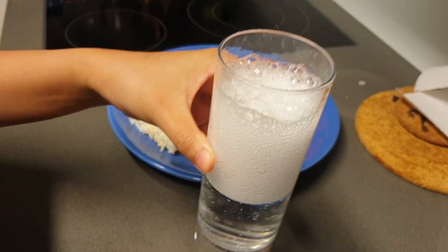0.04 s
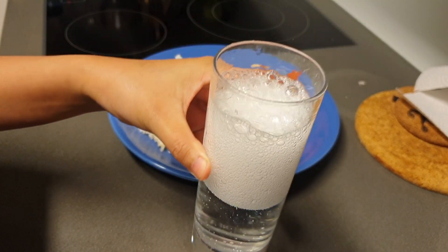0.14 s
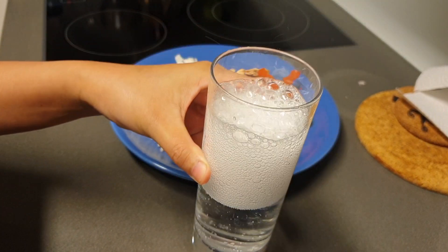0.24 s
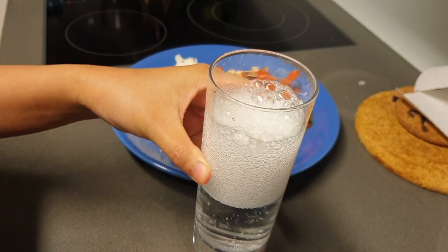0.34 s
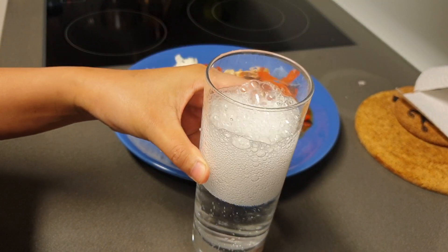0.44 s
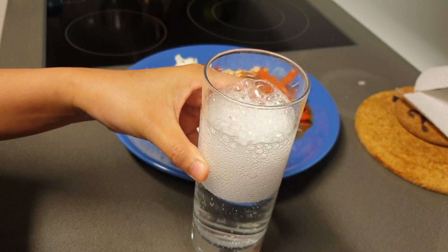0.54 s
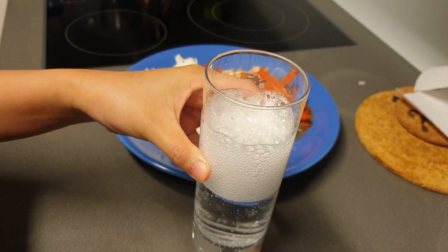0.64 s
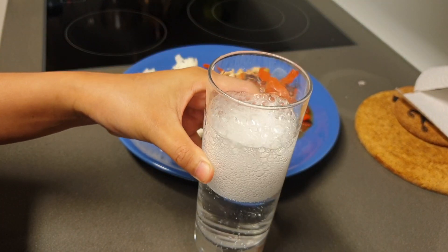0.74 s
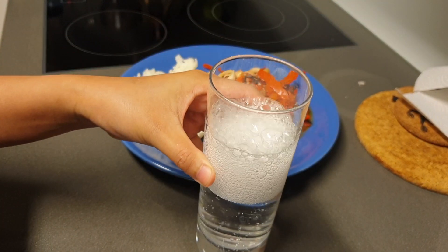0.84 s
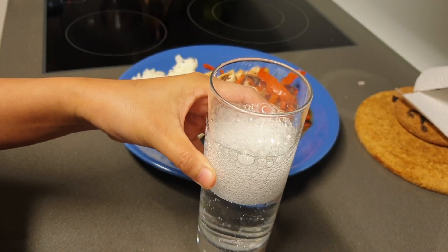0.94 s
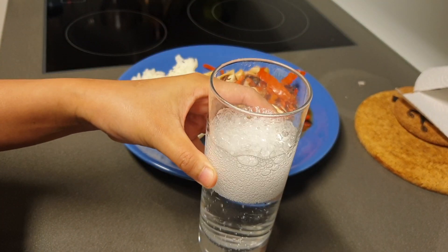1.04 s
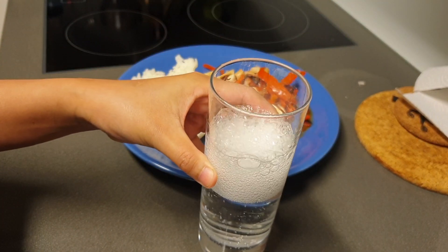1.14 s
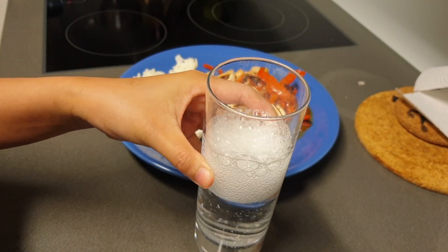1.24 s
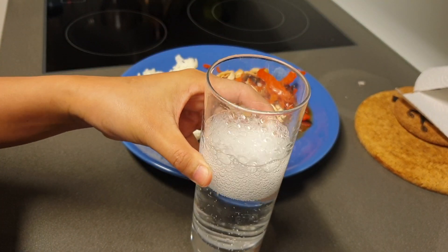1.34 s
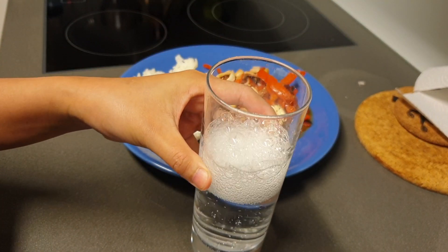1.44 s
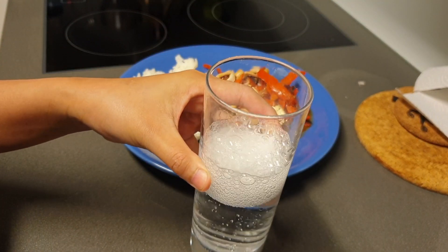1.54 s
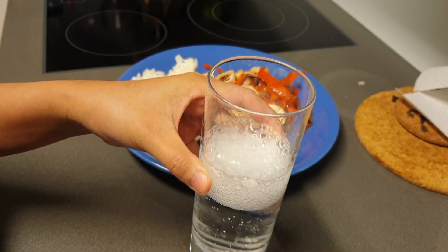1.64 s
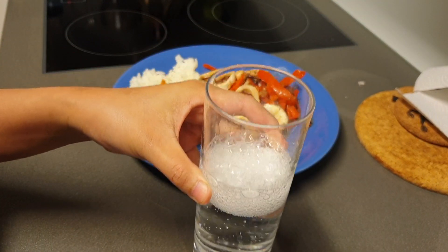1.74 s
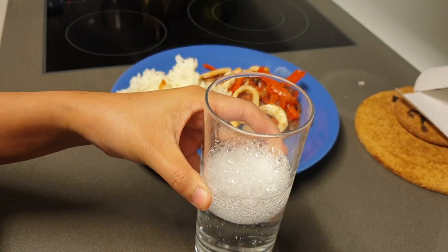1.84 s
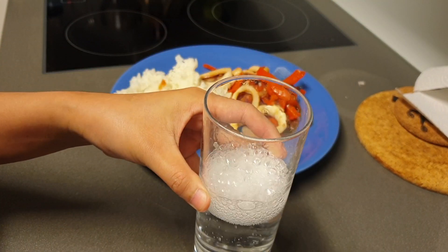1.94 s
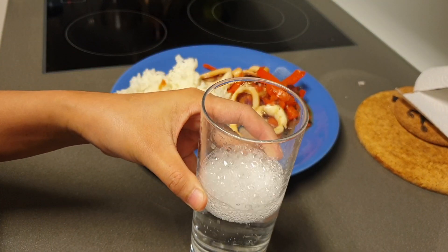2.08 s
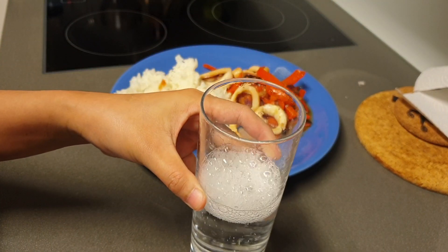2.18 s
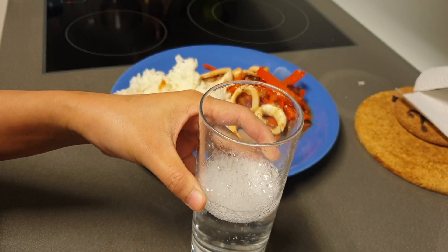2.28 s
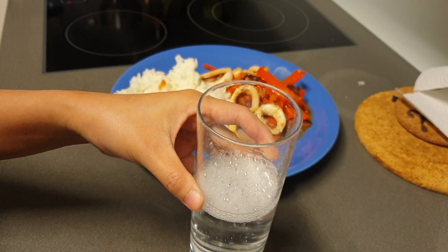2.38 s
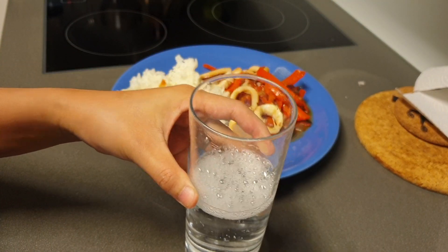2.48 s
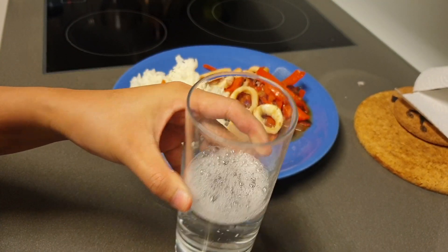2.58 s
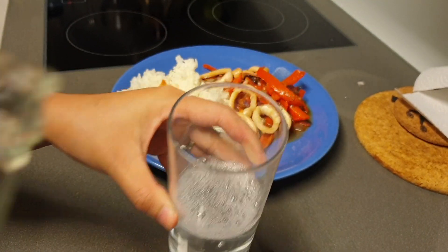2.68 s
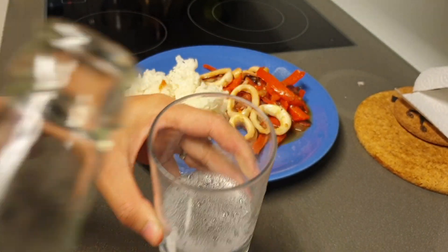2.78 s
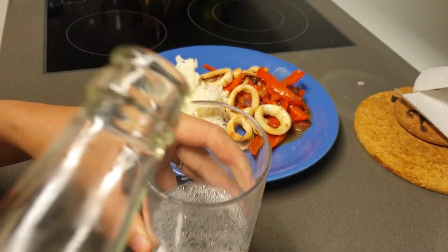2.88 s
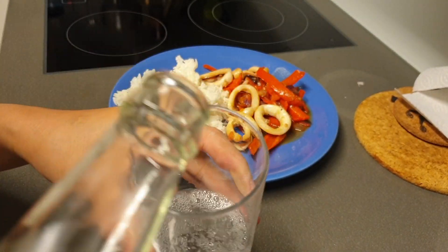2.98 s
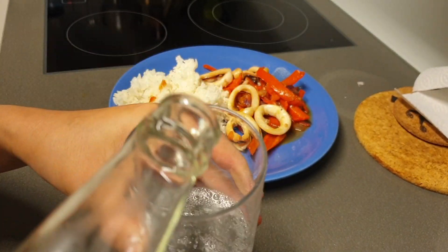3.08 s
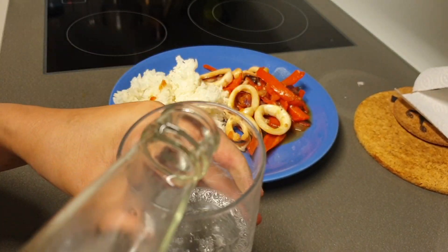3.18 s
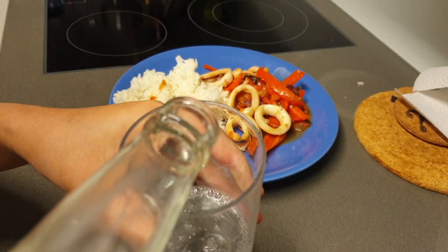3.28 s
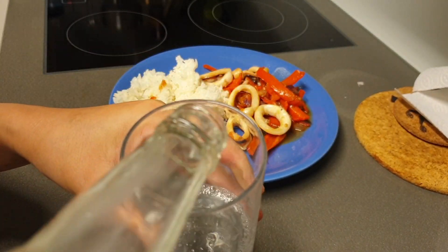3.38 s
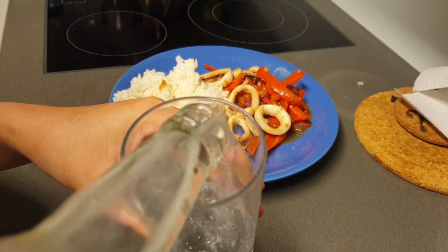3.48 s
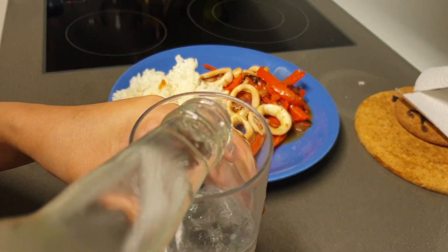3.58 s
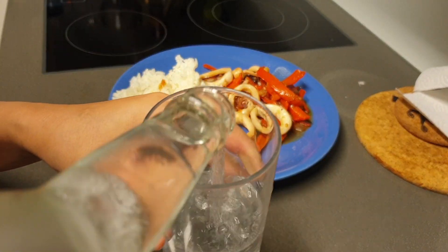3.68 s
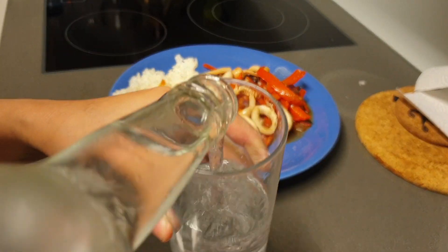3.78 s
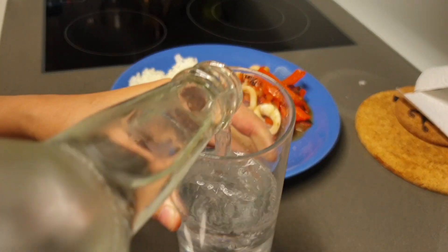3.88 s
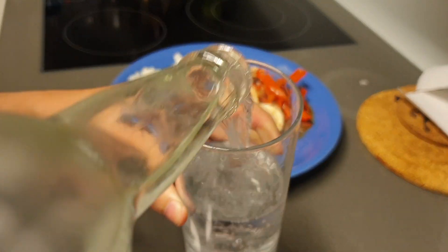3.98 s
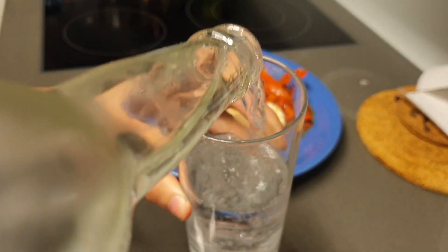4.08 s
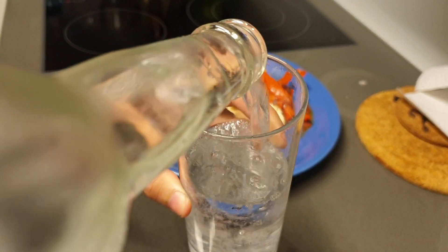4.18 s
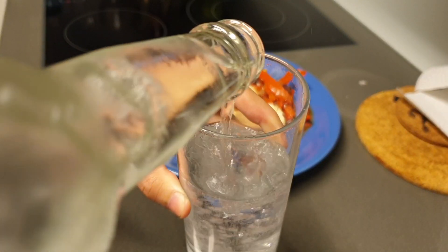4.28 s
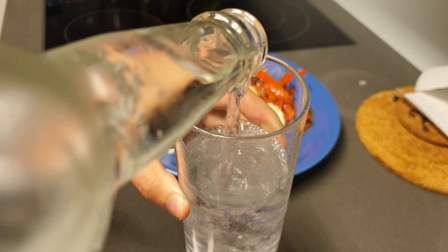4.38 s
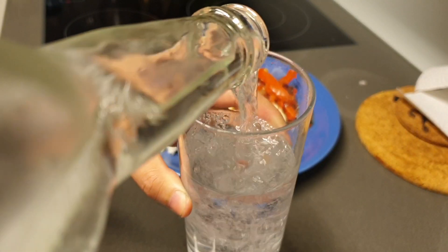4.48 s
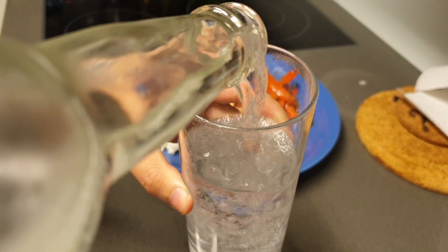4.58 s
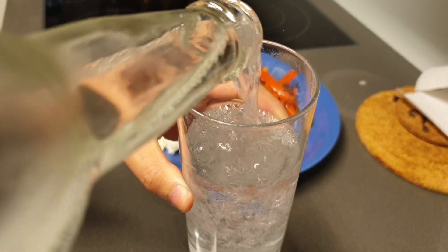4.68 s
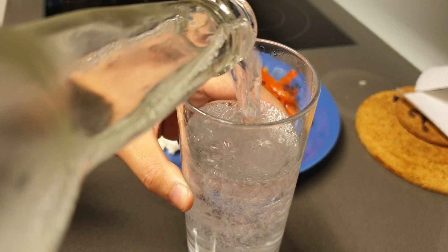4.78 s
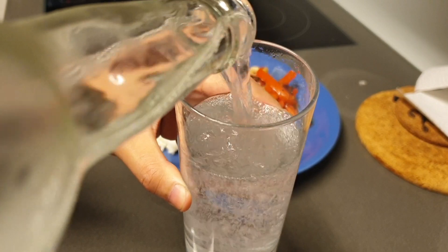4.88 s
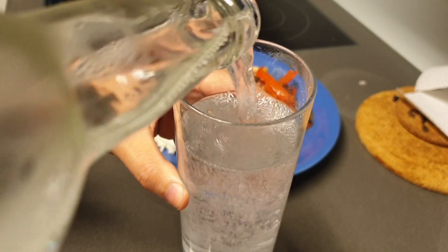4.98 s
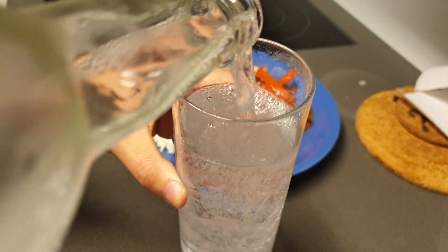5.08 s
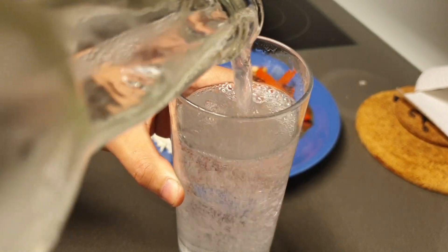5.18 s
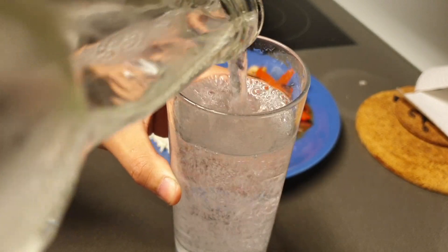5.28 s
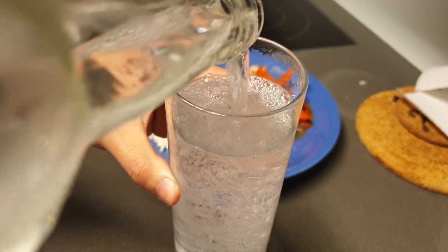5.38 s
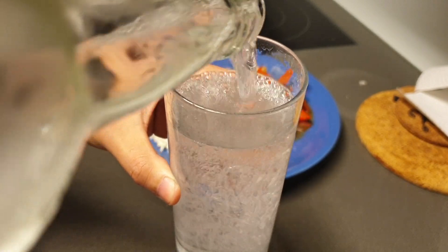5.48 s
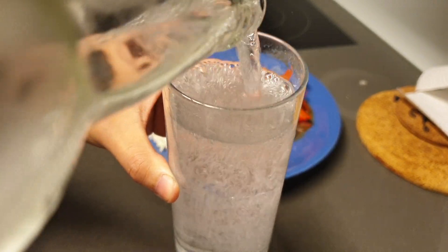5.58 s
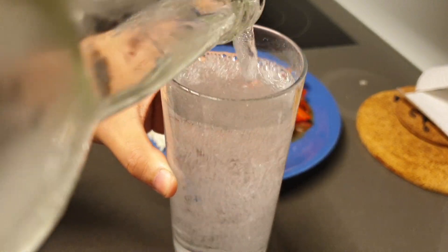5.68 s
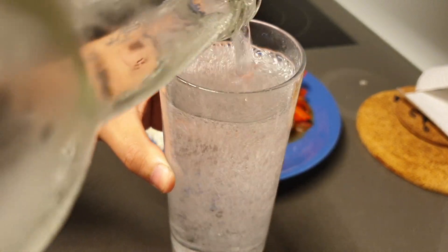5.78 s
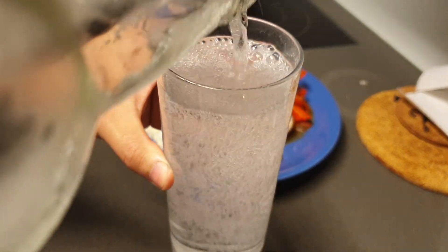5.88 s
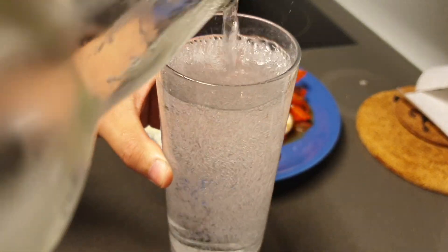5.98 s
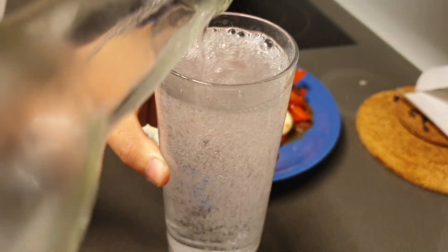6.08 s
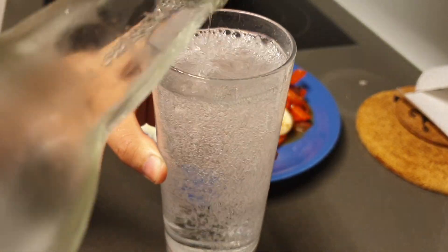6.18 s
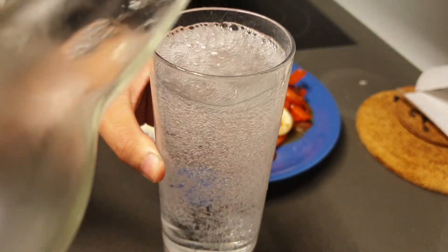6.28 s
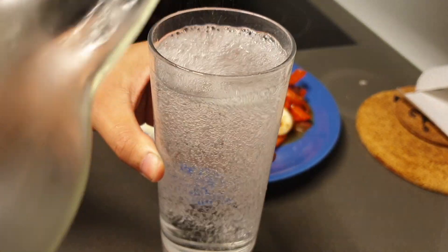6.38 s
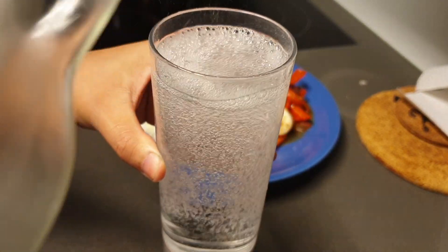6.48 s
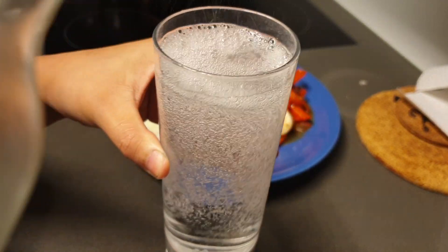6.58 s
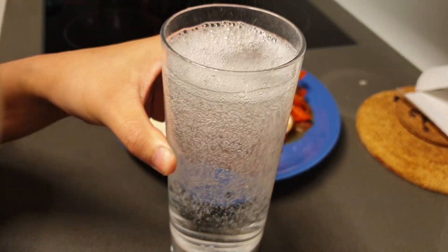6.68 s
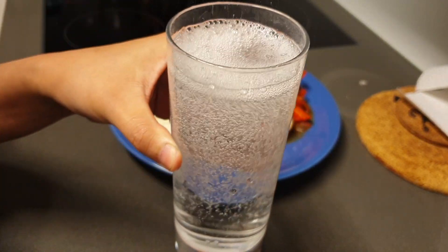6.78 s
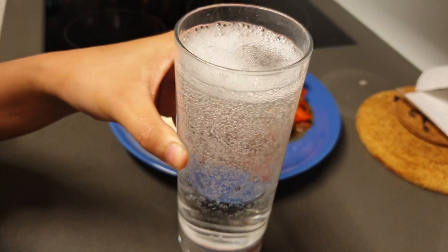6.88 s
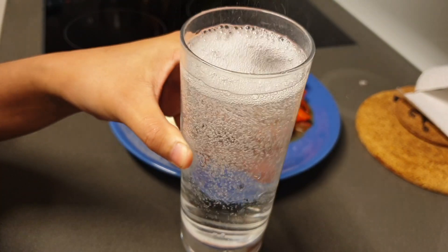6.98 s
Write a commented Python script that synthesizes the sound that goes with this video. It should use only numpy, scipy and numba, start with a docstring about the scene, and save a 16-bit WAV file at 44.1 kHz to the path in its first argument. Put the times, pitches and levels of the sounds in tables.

```python
"""Close at a phone with two microphone ports: foam settles and hisses in a tall glass, in a low-humming kitchen.
Bursting bubbles are shaped noise; the air column above the drink colours them and falls in pitch as foam sinks.
Then a bottle neck clinks on the rim, a sum of glass modes, and soda is poured: noise through the column gurgles
and sprays, bubbles plop as decaying tones, sharp snaps spit, and the room answers the hits shortly.
As the glass fills the column rises in pitch, the plops thin out and fresh foam hisses on to the end."""
import sys
import numpy as np
from scipy import signal
from scipy.fft import rfft, irfft, next_fast_len
from scipy.io import wavfile
from scipy.ndimage import uniform_filter1d, map_coordinates
from numba import njit

SR = 44100
rng = np.random.default_rng(int(sys.argv[2]) if len(sys.argv) > 2 else 0)


def bounce(signal):
    """Save signal as a 16-bit WAV file at the path given by the first command-line argument."""
    frames = np.transpose(np.atleast_2d(signal))
    limited = np.clip(frames, -1, 1)
    pcm = np.round(limited * 32767).astype(np.int16)
    wavfile.write(sys.argv[1], SR, pcm)


N = 310023

# Levels are set at the source, before placement between the ports and the phone's own colour.
# Room rumble over time: start_s [s], level_db [dB]
RUMBLE_LEVEL = [(0, -69.5), (1.25, -70), (1.53, -61.5), (1.75, -70), (2.64, -64), (3.44, -70), (3.64, -63),
                (4.4, -68.5), (4.7, -62.5), (5.1, -66), (5.6, -66), (6.3, -69.5), (6.9, -65.5)]
# Colour of the rumble: pitch_hz [Hz], level_db [dB per Hz, relative]
RUMBLE_COLOUR = [(15, -49), (25, -9.5), (107, 11.5), (146, -1.5), (206, -2.5), (253, -11.5), (280, -7),
                 (356, -7), (615, -18), (897, -14.5), (1160, -20), (1330, -58), (1500, -39), (1950, -42),
                 (3300, -120)]
# Mains tone: pitch_hz [Hz], level_db [dB rms]
MAINS_TONE = [(50, -79)]
# Likeness of the rumble at the two ports: pitch_hz [Hz], likeness [0-1]
ROOM_LIKENESS = [(40, 0.67), (100, 0.93), (180, 0.81), (300, 0.26), (1000, 0.18)]
# Decay of the room's answer: pitch_hz [Hz], t60_s [s]
WALL_DECAY = [(300, 0.15), (2000, 0.24), (12000, 0.041)]

# Air column in the glass: start_s [s], low_mode_hz [Hz], low_width_hz [Hz], upper_mode_hz [Hz], hollowness [0-1]
AIR_COLUMN = [(0, 1580, 710, 2880, 0), (.6, 1240, 457, 2950, 0.2), (1.3, 1110, 348, 3220, 0),
              (1.8, 910, 253, 2830, 0.06), (2.2, 874, 121, 2730, 0.2), (2.8, 876, 71, 2780, 0.3),
              (3.1, 878, 55, 2800, 0.9), (3.5, 817, 48, 2670, 0.8), (3.8, 920, 48.4, 2750, 0.2),
              (4.1, 973, 69.5, 2740, 0.7), (4.5, 1214, 100, 2870, 0.4), (4.95, 1340, 200, 3080, 0.8),
              (5.35, 1790, 284, 3450, 1), (5.52, 2000, 380, 3630, 0.8), (5.7, 2190, 505, 3600, 0.1),
              (6.1, 2720, 800, 4130, 0), (7.03, 2500, 900, 4360, 0.55)]
# Peaks and dips on the way from glass to phone: pitch_hz [Hz], level_db [dB]
GLASS_TO_PHONE = [(500, -16), (680, -8), (760, -2), (900, 0), (1030, -3), (1170, 0), (1350, -7), (1550, 0),
                  (1680, -3), (2200, -2), (5000, -2.5)]
# Likeness of foam and stream at the two ports: pitch_hz [Hz], likeness [0-1]
NEAR_LIKENESS = [(300, 0.47), (700, 0.52), (1100, 0.88), (1600, 0.063), (3100, 0.36), (6800, 0.064),
                 (15000, 0.026)]
# Colour difference of the ports: pitch_hz [Hz], left_minus_right_db [dB]
PORT_COLOUR = [(700, 0), (1000, 0), (2000, 1.5), (8500, -4.5), (11000, 0.5), (13000, -8.5), (15000, -11)]

# Bursting foam by bubble size; the rise near 2.075 s is a handling rustle:
# start_s [s], small_db [dB], larger_db [dB], largest_db [dB]
FOAM_LEVELS = [(0, -54, -60.5, -67.5), (.51, -54.5, -60.5, -66.5), (.84, -50, -58.5, -68.5),
               (1.04, -52, -60.5, -72), (1.64, -51, -58, -72), (2.04, -51, -59, -72),
               (2.075, -50, -54.5, -64), (2.12, -50, -57, -68.5), (2.39, -50.5, -59, -72.5),
               (2.86, -47, -56, -77), (3.13, -48, -61.5, -84), (3.45, -50.5, -70.5, -85),
               (3.6, -49.5, -63, -76), (3.95, -59, -65, -73), (4.45, -56.5, -63.5, -82),
               (5.0, -50.5, -63.5, -67.5), (5.4, -48.5, -61.5, -70), (6.05, -48.5, -57.5, -83),
               (6.54, -46, -56, -72.5), (7.03, -46, -52, -60.5)]
# Foam heard through the column: start_s [s], level_db [dB], low_murmur_db [dB]
FOAM_IN_COLUMN = [(0, -53.5, -76.5), (.6, -52, -77), (.75, -47.5, -75.5), (.88, -46.5, -70),
                  (1.2, -46.5, -72), (1.46, -45.5, -70.5), (1.88, -42, -70.5), (2.04, -39.5, -58.5),
                  (2.25, -42, -68), (2.75, -49, -78), (2.95, -51.5, -97), (3.1, -60.5, -72),
                  (3.3, -59, -82), (3.46, -65, -83)]
# Side of the foam, left minus right: start_s [s], larger_db [dB], small_db [dB]
FOAM_SIDE = [(0, 6, 7.5), (2.0, 8.5, 9.5), (3.3, 9, 9), (5.07, 10, 9), (7.03, 7.5, 8)]
# Colour of small bubbles: pitch_hz [Hz], level_db [dB per Hz, relative]
SMALL_COLOUR = [(3240, -24.5), (4600, -21), (5300, -8.5), (6000, -10), (7140, 1.5), (8630, -8.5),
                (8980, -8), (11500, 1.5), (12700, 4.5), (14200, 2), (15800, -0.5)]
# Colour of larger bubbles: pitch_hz [Hz], level_db [dB per Hz, relative]
LARGER_COLOUR = [(1400, -23), (2000, -10.5), (2250, -2), (2490, 0), (3480, 0.5), (4200, 3.5), (4600, 1),
                 (5100, 3.5), (5900, 1.5), (7000, 1), (8500, -13), (9000, -20), (11700, -42), (19800, -120)]
# Colour of the largest bubbles: pitch_hz [Hz], level_db [dB per Hz, relative]
LARGEST_COLOUR = [(600, -37), (1000, -15), (1420, -13), (1540, 2), (1640, -1), (2100, 2.5), (2800, -19),
                  (5000, -52)]

# Bottle neck on the rim: start_s [s], level_db [dB]
RIM_CLINKS = [(3.494, -30)]
# Modes of the glass: pitch_hz [Hz], level_db [dB re the clink], t60_s [s]
GLASS_MODES = [(1622, -14, .3), (1650, -21, .2), (3395, -15, .2), (3440, -25, .1), (2230, -20, .05),
               (2470, -17, .04), (2750, -11.5, .035), (3080, -24, .2), (3840, -18, .05), (3970, -12, .09),
               (5330, -23, .05), (10060, 2, .02), (11000, -7, .028)]
# Soft low thuds: start_s [s], level_db [dB], pitch_hz [Hz], t60_s [s]
THUDS = [(2.063, -54.5, 400, 0.075), (2.09, -62, 115, 0.2), (3.62, -37.5, 97.4, 0.063),
         (4.018, -51.5, 124, 0.17), (4.189, -46.5, 107, 0.027), (4.499, -56, 397.6, 0.3),
         (4.737, -58.5, 117, 0.36)]

# Sharp spits: start_s [s], level_db [dB], pitch_hz [Hz]
SNAPS = [(2.0571, -42, 5530), (2.057, -42, 7300), (2.0794, -41, 11800), (2.0797, -50, 6700),
         (2.241, -42, 11800), (3.0092, -47, 11800), (3.4792, -75, 10000), (3.538, -38, 11000),
         (3.547, -34, 10300), (3.56, -24, 12400), (3.6027, -32, 6000), (3.601, -31, 11200),
         (3.605, -34, 12500), (3.611, -32, 10800), (3.6163, -21, 12500), (3.6337, -35, 5140),
         (3.671, -40, 10900), (3.7083, -24, 13600), (3.73, -46, 11800), (3.7421, -13.5, 13000),
         (3.746, -29, 6960), (3.7708, -29.5, 6000), (3.775, -29.5, 6100), (3.8449, -32, 5970),
         (3.868, -55, 8000), (3.8864, -41, 7750), (3.893, -34, 7560), (4.019, -51, 11000),
         (4.048, -34.5, 10050), (4.0745, -35.5, 11200), (4.1066, -46, 12300), (4.1244, -37, 11600),
         (4.172, -36, 6460), (4.1745, -33, 8100), (4.1874, -32, 7100), (4.215, -36, 13400),
         (4.2577, -45, 14000), (4.28, -34, 9200), (4.287, -34, 5160), (4.299, -11.5, 11300),
         (4.305, -36, 11800), (4.3275, -29, 7100), (4.36, -32, 10000), (4.3608, -32, 5100),
         (4.3605, -37, 13300), (4.387, -38, 14000), (4.1405, -39, 12700), (4.1245, -39, 14500),
         (4.0748, -37, 14000), (3.7665, -45, 8000), (4.371, -34, 10800), (4.452, -39, 13700),
         (4.4815, -23.5, 14500), (4.505, -28, 14000), (4.578, -40, 6900), (4.595, -47, 11450),
         (4.6499, -28.5, 7100), (4.655, -38, 6660), (4.6783, -43, 11300), (4.703, -44, 6940),
         (4.7404, -29.5, 5940), (4.783, -26, 12200), (4.785, -28.5, 7700), (4.755, -45, 12500),
         (4.689, -42, 13500), (4.611, -43, 11500), (4.804, -40, 12000), (4.812, -40, 11500),
         (4.7857, -28, 10500), (4.837, -31, 13100), (4.838, -35.5, 7740), (4.862, -40, 7240),
         (4.9408, -39, 12500), (4.9631, -45, 10900), (4.9903, -39.5, 6700), (5.044, -36, 11700),
         (5.05, -36, 14500), (5.056, -39, 6960), (5.062, -43, 12400), (5.086, -44, 7100),
         (5.145, -25, 10900), (5.221, -39.5, 7300), (5.324, -39, 13200), (5.389, -40, 7550),
         (5.465, -44, 13900), (5.528, -43, 7000), (5.5784, -32, 12500), (5.672, -39, 13700),
         (5.9426, -41, 7100), (6.278, -38.5, 13500)]
# Bubbles trapped by the stream: start_s [s], level_db [dB], pitch_hz [Hz], t60_s [s]
TRAPPED_BUBBLES = [(3.494, -24, 835, 0.044), (3.602, -35.5, 1093, 0.057), (3.601, -22.5, 3650, 0.024),
                   (3.628, -47, 880, 0.054), (3.709, -53, 2000, 0.017), (3.742, -28.5, 3730, 0.021),
                   (3.545, -39.5, 2560, 0.038), (3.53, -46, 851, 0.1), (3.615, -35, 871, 0.062),
                   (3.615, -28, 4350, 0.021), (3.694, -43, 4010, 0.055), (3.868, -33, 4380, 0.018),
                   (3.742, -30.5, 969, 0.091), (3.747, -27, 939, 0.079), (3.745, -30.5, 2830, 0.019),
                   (3.763, -48, 936, 0.028), (3.776, -24, 954, 0.066), (3.781, -21.5, 966, 0.055),
                   (3.777, -31.5, 2810, 0.021), (3.811, -44, 990, 0.02), (3.846, -27, 2655, 0.022),
                   (3.892, -40, 2860, 0.017), (3.959, -35, 1045, 0.046), (4.013, -35, 985, 0.097),
                   (4.015, -43.5, 2820, 0.028), (4.045, -38, 1002, 0.1), (4.062, -27.5, 980, 0.045),
                   (4.061, -43, 2800, 0.029), (4.075, -38, 998, 0.069), (4.099, -37, 2910, 0.03),
                   (4.108, -36.5, 2950, 0.036), (4.125, -40, 2960, 0.02), (4.22, -57, 1620, .09),
                   (4.25, -49, 1090, 0.069), (4.252, -52, 1770, .06), (4.125, -42, 1103, 0.036),
                   (4.285, -30, 4280, 0.021), (4.298, -31, 1250, 0.0067), (4.3, -39, 4240, 0.017),
                   (4.327, -25, 3586, 0.039), (4.326, -22, 2750, 0.018), (4.359, -24.5, 1555, 0.043),
                   (4.359, -38, 2730, 0.014), (4.359, -43, 1140, 0.029), (4.43, -45, 1130, 0.048),
                   (4.449, -28, 1160, 0.032), (4.45, -36, 4760, 0.017), (4.503, -21, 1143, 0.044),
                   (4.506, -32, 1500, 0.04), (4.506, -38, 910, .035), (4.554, -47, 1130, 0.052),
                   (4.655, -39, 2320, 0.032), (4.678, -27, 1130, 0.021), (4.679, -40.5, 830, 0.024),
                   (4.727, -39, 4030, .02), (4.701, -31, 4370, 0.021), (4.734, -38, 1180, 0.028),
                   (4.687, -44, 1410, .03), (4.767, -39, 4200, .015), (4.775, -27.5, 1300, 0.024),
                   (4.785, -27.5, 1287, 0.023), (4.785, -35, 1550, .025), (4.786, -32, 4070, 0.015),
                   (4.802, -37, 1456, .04), (4.812, -35, 4230, 0.015), (4.824, -40, 3120, 0.018),
                   (4.835, -32, 1360, 0.013), (4.868, -30.5, 1310, 0.025), (4.869, -49, 1590, 0.023),
                   (4.883, -41, 1710, .02), (4.896, -29, 1435, 0.029), (4.897, -44, 1720, .02),
                   (4.94, -36, 1480, .025), (4.961, -42, 1800, 0.029), (4.927, -23.5, 1380, 0.018),
                   (4.96, -38, 1540, 0.012), (4.959, -40, 3300, .019), (4.989, -35, 5020, 0.025),
                   (5.006, -41, 3140, 0.021), (5.025, -43, 3170, 0.034), (5.032, -29.5, 1550, 0.019),
                   (5.038, -31, 1670, 0.024), (5.097, -42, 1770, 0.022), (5.096, -51, 3370, 0.026),
                   (5.104, -39.5, 3300, .025), (5.158, -41, 1606, 0.04), (5.188, -40, 3320, 0.025),
                   (5.231, -38, 4950, 0.015), (5.257, -34, 5150, 0.017), (5.581, -41, 4950, .025),
                   (5.32, -39.5, 1804, 0.038), (5.346, -30.5, 1810, 0.019), (5.431, -45, 1780, 0.032),
                   (5.432, -39, 2260, 0.0081), (5.434, -39, 2760, .012), (5.356, -47, 1470, 0.051),
                   (5.588, -44, 2250, 0.021), (5.586, -46, 1760, 0.031), (5.62, -43, 2250, 0.023),
                   (5.646, -45, 2270, 0.024), (5.656, -40.5, 1820, 0.029), (5.714, -48, 1000, 0.012),
                   (5.717, -39.5, 1540, 0.0049), (5.778, -49.5, 2330, 0.054), (5.779, -38, 3300, 0.0063),
                   (5.797, -40, 4100, .012), (5.915, -47, 1790, 0.02), (5.914, -47, 2650, 0.0094),
                   (5.9155, -37, 3130, 0.013), (5.925, -43, 2730, 0.016), (5.926, -39, 3580, .012),
                   (5.954, -49.5, 1750, .02), (5.957, -43, 3800, .012), (5.924, -52, 1800, .012),
                   (5.781, -46, 3800, .008), (5.956, -47, 2800, .02), (5.998, -45, 2720, .015),
                   (6, -39, 4120, 0.016)]
# Bubbles that bend as they rise or squeeze: start_s [s], level_db [dB], pitch_hz [Hz], t60_s [s], bend [octaves/s]
BENDING_BUBBLES = [(3.6, -42, 2486, 0.13, 1), (3.764, -23.5, 3600, 0.023, 3),
                   (3.892, -25.5, 845, 0.045, -11), (3.912, -49, 1200, 0.059, -2),
                   (3.963, -46, 3880, 0.026, 3), (4.012, -45, 3840, .02, -7), (4.173, -34, 4200, 0.024, -9),
                   (4.21, -43, 4300, .025, -6), (4.27, -42, 2420, 0.028, 2), (4.312, -34, 4100, .025, -5),
                   (4.36, -44, 3120, 0.11, 5), (4.431, -43, 2220, .035, 14), (4.537, -47, 3300, .04, -7),
                   (4.706, -42, 3030, .035, -3.5), (4.738, -49, 2930, 0.033, -4),
                   (4.764, -38, 2880, 0.023, 6), (4.862, -52, 3300, .05, -2), (5.255, -53, 3500, 0.073, -2),
                   (5.465, -38, 3400, 0.016, 6), (5.472, -34.5, 3500, 0.017, 18),
                   (5.516, -63, 3620, .04, 2), (5.536, -45, 3630, 0.032, -7), (5.577, -43, 3520, .04, 2),
                   (5.582, -48, 2800, .02, -25), (5.62, -41, 3550, 0.022, 3), (5.647, -42, 3200, 0.028, -5),
                   (6.016, -53, 2600, .03, 10), (6.057, -45, 3750, 0.028, -2)]

# Stream between splashes: start_s [s], gurgle_db [dB], spray_db [dB]
STREAM_LEVELS = [(3.49, -38, -47.5), (3.7, -70, -53), (3.93, -55, -68), (4.07, -44, -65), (4.2, -55, -71),
                 (4.32, -47.5, -40.5), (4.6, -45, -102), (4.72, -42.5, -50.5), (4.85, -40, -51),
                 (4.95, -43, -67), (5.1, -57, -59.5), (5.55, -77, -61.5), (6.05, -82, -57.5)]
# Gushes that hit the drink: start_s [s], gurgle_db [dB], spray_db [dB]
GUSHES = [(3.497, -46, -65), (3.601, -20.5, -35.5), (3.745, -24.5, -45), (3.771, -58, -37.5),
          (3.845, -43, -61), (3.895, -27.5, -42.5), (4.1, -52, -64), (4.328, -35, -41), (4.361, -26, -31.5),
          (4.455, -34, -75), (4.512, -26, -51), (4.65, -44, -40.5), (4.7, -49, -65), (5.038, -45, -80),
          (5.29, -79, -75)]
# Colour of the spray: pitch_hz [Hz], level_db [dB per Hz, relative]
SPRAY_COLOUR = [(700, -48), (1500, -1), (3500, 5.5), (7000, 8), (9000, -9), (12000, 10), (14000, 9),
                (15800, 5)]
# Air in the emptying bottle: start_s [s], pitch_hz [Hz]
BOTTLE_PITCH = [(3.75, 518), (4.1, 352), (4.45, 330), (4.8, 315), (5.5, 370)]
# Hoots of that air: start_s [s], level_db [dB]
HOOTS = [(3.784, -66), (3.9, -57.5), (4.096, -62), (4.36, -63.5), (4.52, -55.5), (4.794, -62.5),
         (5.49, -69.5)]

LAG = 3  # samples by which the right port hears later
LOW_CUT_HZ, TOP_HZ = 30, 15760
TALLEST = 6  # no burst outgrows this many spreads
NECK_HZ, NECK_WIDTH_HZ = 754, 46  # a steady low mode under the stream
SPLASH_RISE, GURGLE_FALL, SPRAY_FALL = 6400, 810, 830  # dB a second
HOOT_RISE, HOOT_FALL = 270, 153  # dB a second
DAMPED_S, DAMPED_DB_PER_S = .062, 500  # the touching neck soon deadens the ring

START_SHARE = 0.082  # time constant of a bubble's swell, as a share of its ring time
FROTH_DB, SMACK_DB, BLOW_DB = -14, -12, 4  # relative to a plop of 1 kHz
FROTH_SLOPE, SMACK_SLOPE, BLOW_SLOPE = -2, -10, -12.5  # dB for each octave above it
PLOP_LEFT_DB, LEFT_DB_PER_S = 3.5, 2  # mean at the first plop; the surface climbs towards the left port
# A fainter bubble follows each: mean relative level, latest delay, pitch spread
SATELLITE_DB, SATELLITE_S, SATELLITE_OCTAVES = -11.5, .03, 0.217
FAINT_FROM_S, FAINT_TO_S = 3.5, 5.6  # faint bubbles and spits come at random in between
DRIP_FLOOR_DB, DRIP_SPREAD_DB, DRIP_CYCLES = -62.5, 3.5, 36  # cycles in one ring time

SPIT_T60_S, SNAPPIER = 0.0044, 0.22  # for a snap of -28.5 dB; dB off the ring time for each dB more
SCATTER_DB, SCATTER_GROWS = -43.5, 0.76  # droplets with a snap of -34 dB; dB for each dB more
CRACK_DB, PATTER_DB = -10.5, 3.5  # the film's rough click re the snap; spread of droplet sizes
SPIT_LEFT_DB, SPIT_LEFT_SPREAD_DB = 13, 0.1
FLECK_DB, FLECK_SPREAD_DB = -54, 1.5  # before the small bubbles' colour is added
FLECK_LOW_HZ, FLECK_HIGH_HZ = 5780, 14900


def amp(db):
    """Gain for a level in dB."""
    return 10 ** (np.asarray(db) / 20)


def unit(x):
    """Scales to an rms of one."""
    return x / np.sqrt(np.mean(x ** 2) + 1e-20)


def along(points, hz):
    """Reads (pitch_hz, value) points on a log axis."""
    f, v = np.transpose(points)
    return np.interp(np.log(hz + 1), np.log(f + 1), v)


def curves(rows, outside=None):
    """One value per sample for each column after start_s."""
    s, *cols = np.transpose(rows)
    return [np.interp(np.arange(N) / SR, s, c, outside, outside) for c in cols]


def wobble(rate):
    """A smooth random curve, rate knots a second."""
    knots = rng.standard_normal(int(N * rate / SR) + 4)
    return map_coordinates(knots, [np.arange(N) * rate / SR])


def sides(left_db):
    """Left and right gains for a level difference."""
    return amp(np.array([left_db / 2, -left_db / 2]))


def filtered(x, response):
    """Multiplies the spectrum by a complex response of frequency."""
    m = next_fast_len(N + SR // 2)
    return irfft(rfft(x, m) * response(np.fft.rfftfreq(m, 1 / SR)), m)[..., :N]


def add(out, s, sound, left_db):
    """Places a sound; the left port hears it earlier, and louder when left_db is positive."""
    length = sound.shape[-1]
    pair = np.broadcast_to(sound, (2, length))
    for ch, lag in enumerate((0, LAG)):
        piece = out[ch, round(s * SR) + lag:][:length]
        piece += sides(left_db)[ch] * pair[ch, :len(piece)]


def swells(times, peaks_db, rise, fall):
    """A gain that climbs to each peak and falls away, in dB a second."""
    t = np.arange(N) / SR
    slopes = [db - np.maximum(rise * (s - t), fall * (t - s)) for s, db in zip(times, peaks_db)]
    return amp(np.max(slopes, axis=0))


def crackle(spread_db):
    """Two noises of dense bursts whose sizes scatter widely."""
    draws = np.minimum(rng.exponential(size=(2, N // 16 + 1)), TALLEST)
    sizes = amp(spread_db * draws).repeat(16, axis=1)[:, :N]
    return unit(sizes * rng.standard_normal((2, N)))


def rush(pair, spectrum, patchy_db, alike=NEAR_LIKENESS):
    """Colours two noises, gives them patches of random gain and the ports' likeness; the right port lags."""
    z = signal.stft(pair, nperseg=256)[2]
    field = uniform_filter1d(rng.standard_normal(z.shape[1:]), size=7, axis=0)
    field = uniform_filter1d(field, size=5, axis=1)
    pair = signal.istft(z * amp(patchy_db * unit(field)), nperseg=256)[1][:, :N]

    def mid_side(hz):
        turn = np.arccos(np.clip(along(alike, hz), -1, 1)) / 2
        return amp(along(spectrum, hz)) * [np.cos(turn), np.sin(turn)]

    mid, side = filtered(pair, mid_side)
    return unit(np.array([mid + side, np.roll(mid - side, shift=LAG)]))


def puff(t, low_hz, high_hz):
    """A short noise between two frequencies, the lower the more alike at both ports."""
    band = signal.butter(2, [low_hz, min(high_hz, SR / 2 - 100)], "bandpass", fs=SR, output="sos")
    a, b = signal.sosfilt(band, rng.standard_normal((2, len(t))))
    alike = np.clip(1000 / low_hz, 0, .95)
    return unit(np.array([a, alike * a + np.sqrt(1 - alike ** 2) * b]))


@njit
def resonate(x, hz, width, sr):
    """A two-pole resonance whose pitch and width can move."""
    y = np.zeros(len(x))
    for i in range(2, len(x)):
        r = np.exp(-np.pi * width[i] / sr)
        angle = 2 * np.pi * hz[i] / sr
        drive = np.sqrt(1 - r * r) * np.sin(angle) * (x[i] - x[i - 2])
        y[i] = drive + 2 * r * np.cos(angle) * y[i - 1] - r * r * y[i - 2]
    return y


def ring(x, hz, width):
    """Both channels through one moving resonance."""
    return np.array([resonate(v, hz, width, SR) for v in x])


def column(x, upper_db, neck_db=-120):
    """The air above the drink rings at its two modes, the bottle neck at its own."""
    low_hz, width, upper_hz, _ = curves(AIR_COLUMN)
    both = ring(x, low_hz, width) + amp(upper_db) * ring(x, upper_hz, 150 + 1.9 * width)
    neck = amp(neck_db) * ring(x, np.full(N, float(NECK_HZ)), np.full(N, float(NECK_WIDTH_HZ)))
    return filtered(both + neck, lambda hz: amp(along(GLASS_TO_PHONE, hz)))


def hollowed(x):
    """The column lifts its upper mode and cancels a band just above it, as far as it is hollow."""
    upper_hz, depth = curves(AIR_COLUMN)[2:]

    def band(hz, width):
        peak_to_one = np.sqrt(np.tanh(np.pi * width / SR / 2)) / np.sin(2 * np.pi * hz / SR)
        return peak_to_one * ring(x, hz, np.full(N, width))

    return x + np.clip(depth, 0, 1) * (0.32 * band(upper_hz, 220.0) - band(1.23 * upper_hz, 930.0))


def kitchen():
    """A low wavering rumble of the room over a faint mains tone."""
    level = amp(curves(RUMBLE_LEVEL)[0] + 1.6 * wobble(8.2))
    noise = rng.standard_normal((2, N))
    rumble = level * rush(noise, RUMBLE_COLOUR, patchy_db=2.0, alike=ROOM_LIKENESS)
    t = np.arange(N) / SR
    tone = sum(amp(db) * np.sqrt(2) * np.sin(2 * np.pi * hz * t) for hz, db in MAINS_TONE)
    return sides(2.1)[:, None] * (rumble + tone)


def walls(x):
    """The room answers with a noise tail in which each frequency dies at its own speed."""
    hz, t, z = signal.stft(rng.standard_normal((2, SR // 2)), SR, nperseg=256)
    fading = z * amp(-60 * t / along(WALL_DECAY, hz)[:, None])
    tail = signal.istft(fading, SR, nperseg=256)[1]
    delayed = np.pad(x, ((0, 0), (150, 0)))  # samples
    return signal.fftconvolve(delayed, tail / np.linalg.norm(tail[0]), axes=1)[:, :N]


def foam():
    """Small bubbles hiss, larger ones crackle, column and murmur sound below; a handling rustle swells briefly."""
    small_db, larger_db, largest_db = curves(FOAM_LEVELS)
    larger_left, small_left = curves(FOAM_SIDE)
    hollow_db, murmur_db = curves(FOAM_IN_COLUMN, outside=-120)  # as good as silent once the stream starts
    surge = 0.75 * wobble(24)
    small = rush(crackle(2.65), SMALL_COLOUR, patchy_db=1.5)
    small *= amp(small_db + 0.92 * surge) * sides(small_left)
    larger = rush(crackle(2.1), LARGER_COLOUR, patchy_db=1.5)
    larger *= amp(larger_db + 1.5 * surge) * sides(larger_left)
    largest = rush(crackle(1.8), LARGEST_COLOUR, patchy_db=2.0)
    largest *= amp(largest_db) * sides(larger_left)
    stir = rush(crackle(0.54), [(300, -26), (800, -0.5), (4000, -2.0)], patchy_db=0.64)
    hollow = amp(hollow_db) * column(stir, upper_db=-17.0)
    murmur_colour = [(150, -6.0), (300, 1.0), (400, 4.5), (550, -2.5), (1000, -15.5)]
    murmur = amp(murmur_db) * rush(crackle(0.34), murmur_colour, patchy_db=2.5)
    return hollowed(small + larger + largest) + (hollow + murmur) * sides(6.1)[:, None]


def knocks():
    """The bottle neck rings the modes of the glass; hand and bottle thud softly."""
    out, t = np.zeros((2, N)), np.arange(SR // 2) / SR
    for s, db in RIM_CLINKS:
        modes = sum(amp(db + level_db - 60 * t / t60) * np.sin(2 * np.pi * hz * t)
                    for hz, level_db, t60 in GLASS_MODES)
        add(out, s, amp(-DAMPED_DB_PER_S * np.maximum(t - DAMPED_S, 0)) * modes, 6.5)
        grate = amp(db - 21 - 60 * t / 0.27) * puff(t, 1560, 3900)  # rim and neck as they meet
        add(out, s, grate, 6.5)
    for s, db, hz, t60 in THUDS:
        envelope = 1.8 * amp(db - 60 * t / t60) * (1 - np.exp(-t / 0.0017))
        add(out, s, envelope * np.sin(2 * np.pi * hz * t), 3.5)
    return out


def flecks(count):
    """Rows of faint spits, weighted by the colour of the small bubbles at their pitch."""
    when, size, tune = rng.random((count, 3)).T
    s = FAINT_FROM_S + when * (FAINT_TO_S - FAINT_FROM_S)
    hz = FLECK_LOW_HZ + tune * (FLECK_HIGH_HZ - FLECK_LOW_HZ)
    level_db = FLECK_DB - FLECK_SPREAD_DB * np.log(size) + along(SMALL_COLOUR, hz)
    return list(zip(s, level_db, hz))


def spits():
    """A small bubble snaps as a brief high tone; its film cracks and droplets scatter."""
    out, t = np.zeros((2, N)), np.arange(SR // 20) / SR
    for s, db, hz in SNAPS + flecks(count=130):
        left_db = rng.normal(SPIT_LEFT_DB, SPIT_LEFT_SPREAD_DB)
        turn = [[0], [rng.uniform(0, 2 * np.pi)]]  # paths to the ports differ by a few wavelengths
        droplets = amp(PATTER_DB * rng.exponential(size=len(t) // 32 + 1))
        patter = unit(droplets.repeat(32)[:len(t)])  # droplets land one by one
        scatter_db = SCATTER_DB + SCATTER_GROWS * (db + 34)
        hurry = amp(SNAPPIER * (db + 28.5))  # louder snaps die sooner
        envelope = 2.38 * amp(db - 60 * t / SPIT_T60_S * hurry) * (1 - np.exp(-t / 0.00036))
        add(out, s, envelope * np.sin(2 * np.pi * hz * t + turn), left_db)
        scatter = amp(scatter_db - 60 * t / 0.016) * patter * puff(t, 0.5 * hz, 1.44 * hz)
        add(out, s, scatter, 0.99 * left_db)
        crack = amp(db + CRACK_DB - 60 * t / 0.0045) * puff(t, 0.86 * hz, 1.3 * hz)
        add(out, s, crack, left_db)
    return out


def bubble(t, hz, t60, bend=0.77):
    """A trapped bubble rings with a soft start and a wavering pitch that bends in octaves a second."""
    waver = 0.025 * np.sqrt(hz / SR) * np.cumsum(rng.standard_normal(len(t)))
    t60 = max(t60, .004)
    start = 1 - np.exp(-t / (START_SHARE * t60))
    pitch_hz = hz * 2 ** (bend * np.minimum(t, t60))
    return amp(-60 * t / t60) * start * np.sin(2 * np.pi * np.cumsum(pitch_hz) / SR + waver)


def drips(count):
    """Rows of faint bubbles, pitched around either mode of the column or higher."""
    when, size, mode, tune = rng.random((count, 4)).T
    s = FAINT_FROM_S + when * (FAINT_TO_S - FAINT_FROM_S)
    low_hz, _, upper_hz, _ = (c[(s * SR).astype(int)] for c in curves(AIR_COLUMN))
    centre_hz = np.select([mode < .3, mode < .65], [low_hz, upper_hz], 1.28 * upper_hz)
    hz = centre_hz * (0.89 + 0.49 * tune)
    return list(zip(s, DRIP_FLOOR_DB - DRIP_SPREAD_DB * np.log(size), hz, DRIP_CYCLES / hz))


def plops():
    """Each bubble rings in a froth of neighbours; the surface smacks and the blow sets off the column."""
    out, blows = np.zeros((2, N)), np.zeros((2, N))
    ringing, t = np.arange(SR // 8) / SR, np.arange(SR // 20) / SR
    first_s = TRAPPED_BUBBLES[0][0]
    for s, db, hz, t60, *bend in TRAPPED_BUBBLES + BENDING_BUBBLES + drips(count=210):
        left_db = PLOP_LEFT_DB + LEFT_DB_PER_S * (s - first_s) + rng.normal(0, 2.6)
        octaves = np.log2(hz / 1000)
        add(out, s, amp(db) * bubble(ringing, hz, t60, *bend), left_db)
        delay, tune, size = rng.random(), rng.normal(), rng.normal()
        satellite = bubble(t, hz * 2 ** (SATELLITE_OCTAVES * tune), min(0.74 * t60, .05))
        add(out, s + SATELLITE_S * delay, amp(db + SATELLITE_DB + 1.9 * size) * satellite, left_db)
        froth_db = db + FROTH_DB + FROTH_SLOPE * octaves
        add(out, s, amp(froth_db - 60 * t / 0.034) * puff(t, 0.93 * hz, 1.205 * hz), left_db)
        smack_db = db + SMACK_DB + SMACK_SLOPE * octaves
        add(out, s, amp(smack_db - 60 * t / 0.0051) * puff(t, 1.02 * hz, 1.55 * hz), left_db)
        blow_db = db + BLOW_DB + BLOW_SLOPE * octaves
        add(blows, s, amp(blow_db - 60 * t / 0.006) * rng.standard_normal(len(t)), left_db)
    return out + column(blows, upper_db=-25, neck_db=-4)


def stream():
    """Falling soda gurgles in the column and neck and sprays, swelling at gushes; the bottle's air hoots faintly."""
    gurgle_db, spray_db = curves(STREAM_LEVELS, outside=-120)
    s, gush_db, shower_db = np.transpose(GUSHES)
    gurgle = amp(gurgle_db) + swells(s, gush_db, SPLASH_RISE, GURGLE_FALL)
    shower = amp(spray_db) + swells(s, shower_db, SPLASH_RISE, SPRAY_FALL)
    churn = wobble(45)
    bursts = amp(2 * churn) * crackle(2)
    drive = gurgle * rush(bursts, [(300, -29), (800, 4), (6000, 2.0)], patchy_db=5.5)
    patter = amp(3 * churn) * rush(crackle(3), SPRAY_COLOUR, patchy_db=4.5)
    spray = hollowed(shower * patter)
    _, width, upper_hz, _ = curves(AIR_COLUMN)
    trickle = amp(-10.0) * ring(spray, upper_hz, 120 + 0.18 * width)
    breath = rush(rng.standard_normal((2, N)), [(100, -3), (1000, -3.5), (3000, -60)], patchy_db=2)
    bottle_air = unit(ring(breath, curves(BOTTLE_PITCH)[0], np.full(N, 40.)))
    hoot = swells(*np.transpose(HOOTS), HOOT_RISE, HOOT_FALL) * bottle_air
    gurgling = column(drive, upper_db=-17.5, neck_db=-9.0)
    return (gurgling + spray + trickle + hoot) * sides(6.9)[:, None]


def scene():
    """Glass and stream near the phone, the room behind; only the hits get the room's answer."""
    hits = plops() + spits() + knocks()
    answer = amp(-10) * walls(hits)
    return kitchen() + answer + foam() + hits + stream()


def record(dry):
    """Each port has its own colour; the phone drops the deepest bass and keeps nothing above its band limit."""
    def phone(hz):
        bass_cut = (1j * hz / (LOW_CUT_HZ + 1j * hz)) ** 2
        return sides(along(PORT_COLOUR, hz)) * bass_cut * (hz < TOP_HZ)

    return filtered(dry, phone)


dry = scene()
out = record(dry)
bounce(out)
```